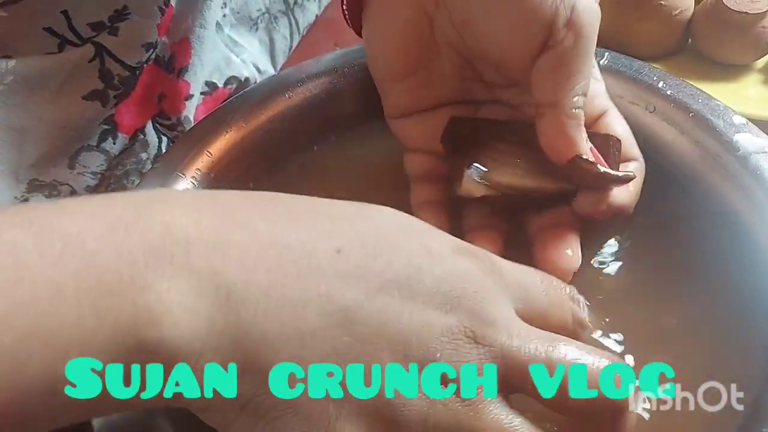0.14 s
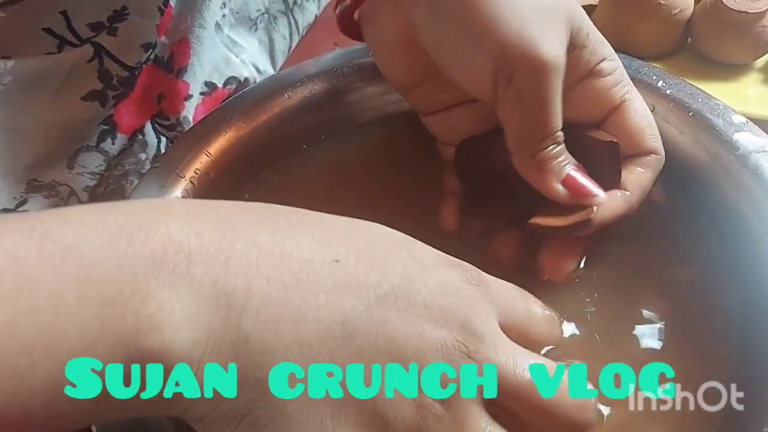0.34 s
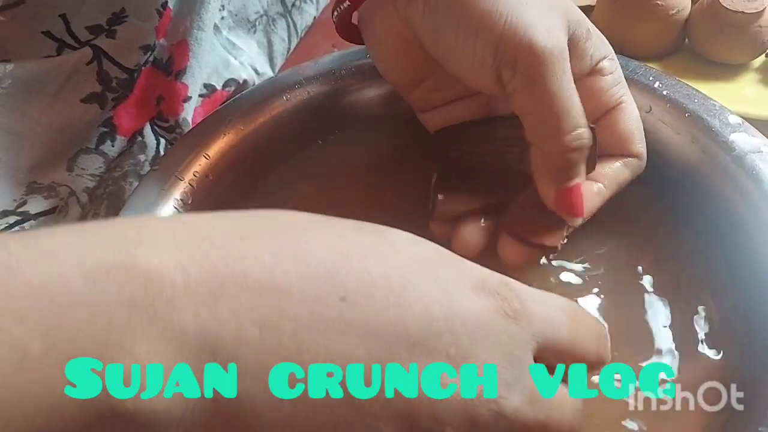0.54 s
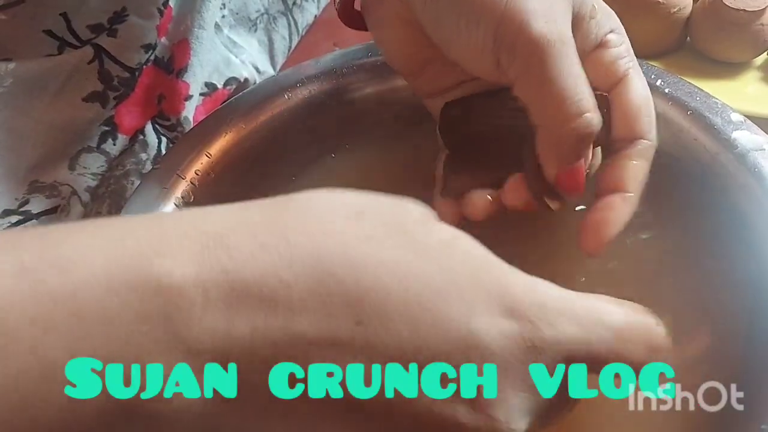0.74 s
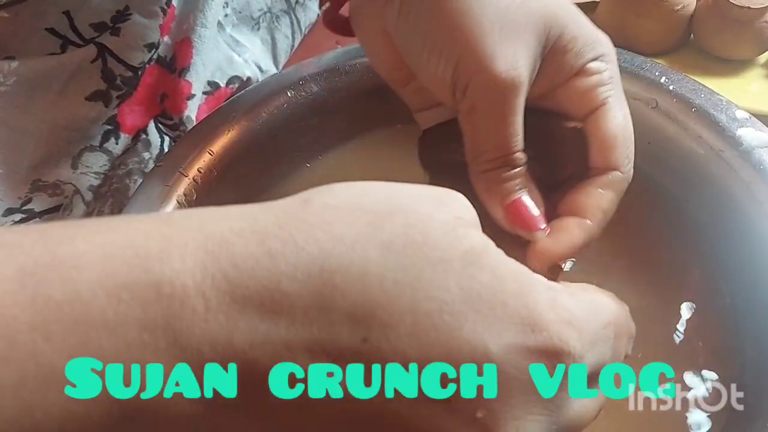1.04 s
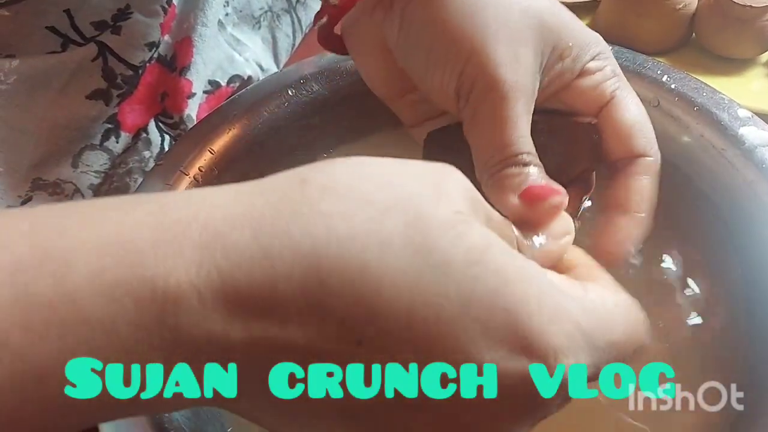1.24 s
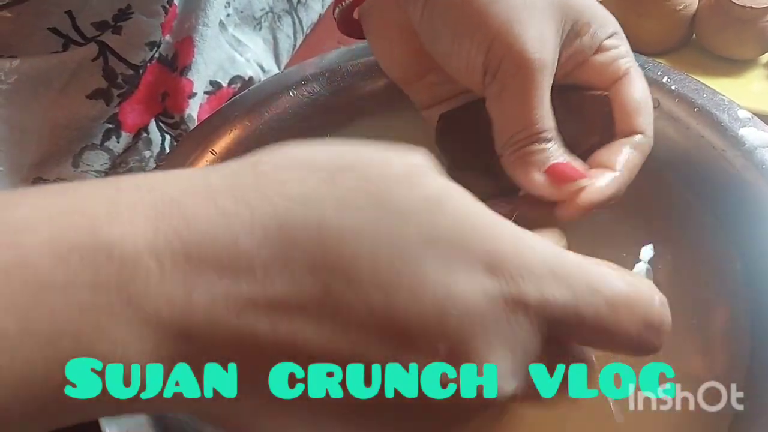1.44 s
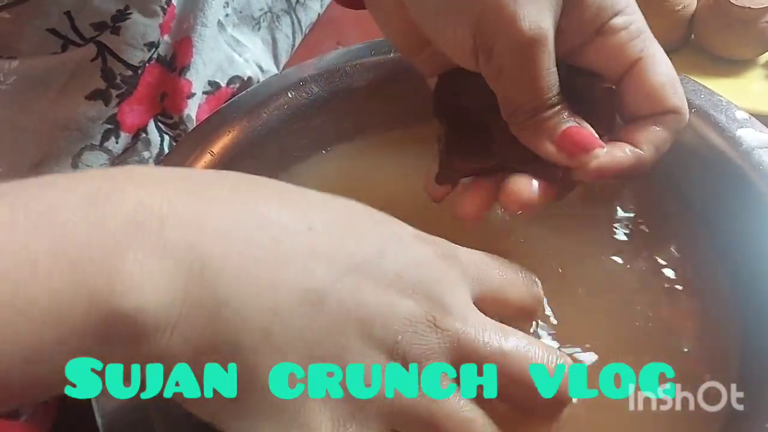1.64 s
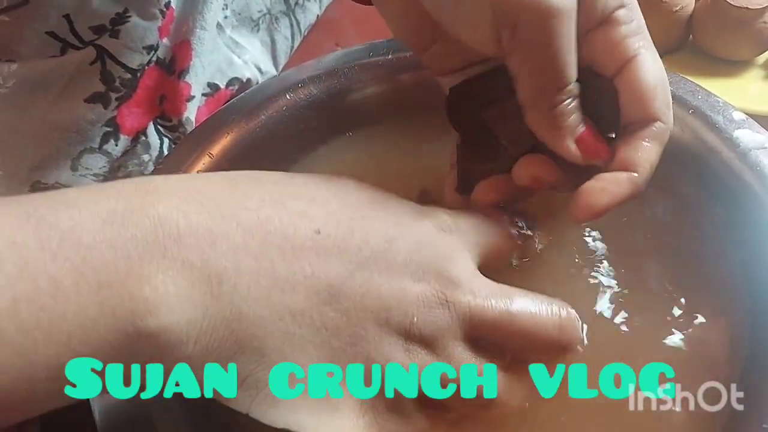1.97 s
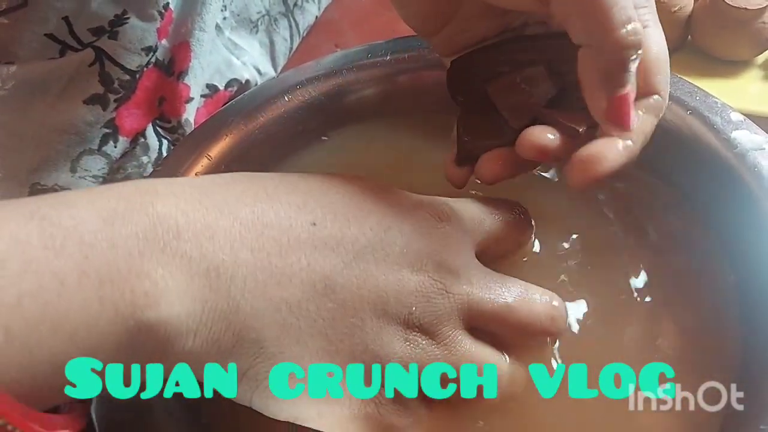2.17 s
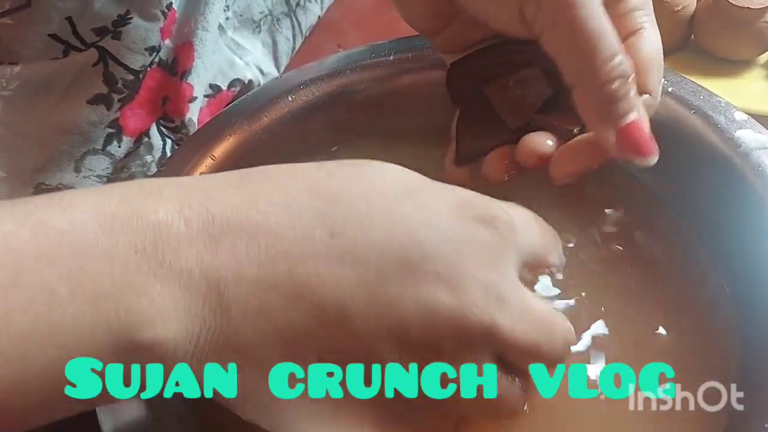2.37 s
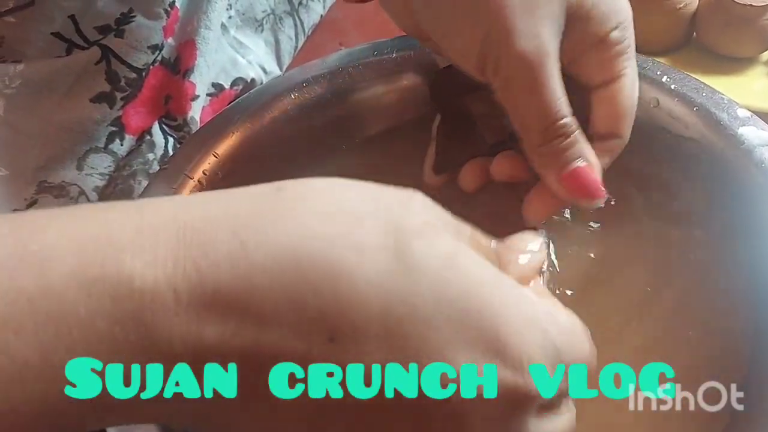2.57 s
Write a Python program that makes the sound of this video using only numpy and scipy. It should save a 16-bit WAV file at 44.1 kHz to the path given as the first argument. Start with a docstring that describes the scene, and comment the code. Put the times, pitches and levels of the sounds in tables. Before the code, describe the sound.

Wet clay shards clink and grate in the hands, close to a phone microphone; a busy cluster comes first, then a lull, then more clinks with metal basin rings, over steady distant hammering and faint hum.

```python
"""Wet clay shards over a steel basin

Taken close, on a phone: wet shards clink (ringing modes struck by a short chatter) and rub (dense grains).
Now and then they touch the basin wall, which rings in sine modes, or bump dully; droplets tick as brief tones.
Far off someone hammers at an even pace in an echoing yard: noise that swells and dies band by band.
Mains hum, two wavering sines, and room hiss, coloured noise, lie under it all."""
import sys
import numpy as np
from scipy import signal
from scipy.fft import rfft, irfft
from scipy.io import wavfile
from scipy.ndimage import uniform_filter1d

SR = 44100
rng = np.random.default_rng(int(sys.argv[2]) if len(sys.argv) > 2 else 0)


def generate_wav(signal):
    """Clip the signal to [-1, 1] and save it as 16-bit WAV at the path in sys.argv[1]."""
    frames = np.transpose(np.atleast_2d(signal))
    scaled = np.clip(frames, -1, 1) * 32767
    pcm = np.round(scaled).astype(np.int16)
    wavfile.write(sys.argv[1], SR, pcm)


N = 119070
T = np.arange(N) / SR
FREQS = np.arange(N // 2 + 1) * SR / N
APART = np.array([[0], [np.pi / 2]])  # phase of the left and right microphone ports, radians

# ringing modes of a clay shard: f/Hz, level/dB, t60/s
SHARD_MODES = [(504, -2.5, 0.064), (912, -0.5, 0.033), (1276, -1.5, 0.028), (1612, 1.5, 0.045),
               (1815, -4, 0.13), (2267, 2, 0.055), (2439, 3, 0.039), (3124, 0.5, 0.028), (3562, 1.5, 0.079),
               (4291, 1, 0.064), (4432, -3.5, 0.058), (4640, -6.5, 0.024), (5363, -4, 0.076),
               (5840, -11, 0.08)]


def undb(db):
    """Decibels to an amplitude factor."""
    return 10 ** (np.asarray(db) / 20)


def at(table, hz):
    """Second column of a table, read on a log-frequency axis."""
    points = np.array(table, float)
    return np.interp(np.log(np.maximum(hz, 1)), np.log(points[:, 0]), points[:, 1])


def shape(x, table):
    """Colour a sound by (f/Hz, level/dB) points and bring it to rms 1."""
    y = irfft(rfft(x) * undb(at(table, FREQS)), N)
    return y / np.sqrt(np.mean(y ** 2))


def stereo_noise():
    """Noise at the two ports, mixed from mid and side so that their likeness varies with pitch."""
    # likeness of the two channels: f/Hz, correlation (0 to 1)
    likeness = [(30, 0.074), (60, 0.44), (130, 1), (250, 0.6), (500, 0.43), (1500, 0.072), (15000, 0.038)]
    c = at(likeness, FREQS)
    mid, side = rfft(rng.standard_normal((2, N))) * np.sqrt([(1 + c) / 2, (1 - c) / 2])
    return irfft(np.array([mid + side, mid - side]), N)


def walk(rate):
    """Wandering curve: random values, `rate` per second, smoothed by two running means."""
    k = int(SR / rate)
    steps = np.repeat(rng.standard_normal(N // k + 1), k)
    return 0.81 * uniform_filter1d(uniform_filter1d(steps, k), k)[:N]


def ring(hz, gain, t60, phase, size):
    """Sum of dying sines for two channels; gain and phase are (channel, mode)."""
    t = np.arange(size) / SR
    modes = np.exp(np.outer(2j * np.pi * hz - np.log(1000) / t60, t))
    onset = np.minimum(t * 4000, 1)  # 0.25 ms
    return ((gain * np.exp(1j * phase)) @ modes).imag * onset


def add(out, x, s):
    """Lay a sound into the scene from s seconds on."""
    i = int(s * SR)
    out[:, i:i + x.shape[1]] += x[:, :N - i]


def room():
    """Slightly wavering hiss, and a mains hum of two sines an octave apart."""
    # level of the hum: t/s, rms level/dB near 100 Hz, rms level/dB near 200 Hz
    hum_levels = [(0.0, -72, -78), (0.32, -67, -59), (0.55, -66.5, -67), (0.59, -58, -62.5),
                  (0.87, -70.5, -65), (1.11, -60, -63.5), (1.19, -76, -74), (1.26, -60.5, -54.5),
                  (1.62, -67, -74.5), (1.67, -68, -65), (1.84, -58, -56), (2.17, -66, -69.5),
                  (2.33, -56, -56.5), (2.5, -82, -59.5), (2.59, -67, -59.5), (2.7, -70, -77)]
    # colour of the hiss: f/Hz, level/dB
    hiss_colour = [(25, -27), (50, -9.5), (80, -5), (206, -3), (516, -27.5), (660, -23), (820, -27),
                   (2200, -27), (2600, -24), (4250, -13.5), (5430, -19.5), (7100, -22.5), (16000, -34)]
    hum_hz, hiss_db = 100.35, -60.5
    s, *levels = np.array(hum_levels).T
    out = undb(hiss_db + 2.0 * walk(4.16)) * shape(stereo_noise(), hiss_colour)
    for k in range(2):
        level_db = np.interp(T, s, levels[k]) + 1.9 * walk(14.1)
        phase = 2 * np.pi * (k + 1) * hum_hz * T + 0.52 * walk(8.46)
        out += undb(3 + level_db) * np.sin(phase)  # 3 dB: rms to peak of a sine
    return out


def clinks():
    """A few ms of chatter rings the shards and a pitch of its own; a short noisy tail follows."""
    # clinks: t/s, peak level of the ring/dB, own pitch f/Hz, relative level/dB near 1 kHz, near 2 kHz,
    # near 4 kHz, share of the free ring time, chatter/ms
    clink_events = [(0.049, -45.5, 2440, -11, -16.5, -21, 1, 2.1),
                    (0.127, -45, 3900, -27, -23, -8, 0.53, 4.4), (0.138, -51, 4100, -12, 0, -27, 0.64, 3.6),
                    (0.148, -46, 935, 3, -12, -23, 1, 8), (0.201, -37.5, 3650, 13, -1, -17, 0.39, 2.2),
                    (0.237, -23.5, 1380, -4.5, -11.5, -20.5, 1, 2.5),
                    (0.242, -31, 1880, -15, -6, -13, 1, 7.8), (0.248, -27.5, 2000, -26, -26, -12, 1, 1.4),
                    (0.291, -27.5, 1930, -11.5, -12, -7, 1, 3.4), (0.315, -28, 4280, -7, -3, -22, 1, 4.3),
                    (0.339, -20, 3500, -11, -20, -8.5, 0.5, 1.56),
                    (0.342, -24.5, 4350, -10.5, -15, -27, 0.46, 3.8),
                    (0.367, -26.5, 3450, -27, -12, -19, 0.6, 2.3),
                    (0.415, -32.5, 4140, -18, -18, -7, 1, 2.2), (0.432, -39, 1820, -12.5, -28, -13, 1, 4.5),
                    (0.552, -28.5, 1713, -17, -18.5, -17.5, 0.9, 3.06),
                    (0.565, -31, 1955, -13, -15, -26, 0.6, 10), (0.747, -35, 896, -11, -8, -28, 0.7, 5.4),
                    (0.896, -42.5, 2500, -61, -2, -9, 0.86, 3.3),
                    (1.14, -54, 4400, -12, -26, -8, 0.51, 1.5), (1.159, -53.5, 2530, -29, -18, -9, 0.83, 4),
                    (1.409, -52, 1570, -25, -8, -11, 0.9, 2.8), (1.657, -43, 3600, -13, -17, -6, 0.39, 1.7),
                    (1.67, -36, 4490, -9, -13.5, -8, 1, 3.8), (1.737, -31, 1050, -3, -8.5, -37, 1, 1.6),
                    (1.774, -41, 3680, -9, -12, -8, 0.7, 4), (1.789, -35.5, 4130, -10, -15, -12, 1, 4.9),
                    (1.811, -22.5, 1165, -8, -9.5, -11, 0.8, 4), (1.87, -36, 1120, -14, -6, -8, 1, 4),
                    (1.906, -36, 2440, -28, -35, 0, 1, 2.7), (1.99, -29.5, 1150, -19, -10, -16, 0.94, 5.2),
                    (2.014, -46, 1090, -4, -18, -20, 1, 7.3), (2.06, -28, 3640, -38, -2.5, 1, 0.89, 1.7),
                    (2.074, -35, 3515, 14.5, -2, 8, 0.96, 3.6),
                    (2.113, -26, 3560, -8.5, -12, -15.5, 0.76, 5),
                    (2.123, -30, 1150, -13, -15, -17, 1, 1.5), (2.204, -35, 4180, -15, -21, -9, 1, 4.5),
                    (2.279, -32.5, 3210, -6, -12, -26, 0.46, 4.8),
                    (2.342, -35, 1650, -20, -2, -33, 0.42, 3.8),
                    (2.433, -37, 1666, -16, -14, -18.5, 1, 2.3),
                    (2.505, -36.5, 3650, -39, -17, -8, 0.53, 1.4),
                    (2.547, -38, 3690, -25, -4, -12, 0.94, 2.2),
                    (2.671, -46.5, 1760, -24, -35, -9, 0.99, 2.7),
                    (2.691, -49.5, 3850, -19, -14, -4, 0.7, 2.3)]
    own_db, own_t60_s = 4.5, 0.039  # the clink's own pitch, above its strongest colour point
    treble_db = -26.5  # 12 kHz against 4 kHz
    scatter_db, pitch_spread = 3, .02  # random spread of mode level, and of mode pitch as a share
    crack_db, tail_db, tail_t60_s = -1, -10.5, 0.67  # the share of ring time scales the tail too
    hz, mode_db, t60 = np.array(SHARD_MODES).T
    size = 6000
    t, f = np.arange(size) / SR, np.arange(size // 2 + 1) * SR / size
    out = np.zeros((2, N))
    for s, peak, own_hz, low, mid, high, held, ms in clink_events:
        colour = [(400, low - 14), (1000, low), (2000, mid), (4200, high), (12000, high + treble_db)]
        g = rng.standard_normal((5, len(hz) + 1))
        noise = rng.standard_normal((5, size))

        # the free ring of shard and own pitch, a little different each time
        own_level_db = own_db + max(low, mid, high)
        gain = undb(np.append(mode_db + at(colour, hz), own_level_db) + scatter_db * g[:2])
        pitches = np.append(hz * (1 + pitch_spread * g[3, 1:]), own_hz)
        phase = 2 * g[2] + APART * (1 + .5 * g[4])
        body = ring(pitches, gain, held * np.append(t60, own_t60_s), phase, size)

        # chatter of the contact drives it, with a sharp first knock
        chatter = np.exp(-(t * 1000 / ms) ** 2)
        push = noise[0] * chatter
        push[0] += 3
        push /= np.sqrt(np.sum(push ** 2))
        hit = signal.fftconvolve(body, push[None], axes=1)[:, :size]
        hit /= np.abs(hit.mean(axis=0)).max()

        # two channels of noise for the crack, two for the tail
        hiss = irfft(rfft(noise[1:]) * undb(at(colour, f)), size)
        hiss /= 3.26 * hiss.std()
        hit += undb(crack_db) * hiss[:2] * chatter
        tail_fall = undb(-60 * t / (held * tail_t60_s)) * np.minimum(t * 200, 1)
        hit += undb(tail_db) * hiss[2:] * tail_fall
        add(out, undb(peak) * hit, s)
    return signal.sosfilt(signal.butter(2, 350, "high", fs=SR, output="sos"), out)


def basin():
    """The steel wall rings in its modes until a hand or the water stills it; bumps are dull dying sines."""
    # modes of the basin wall: f/Hz, level/dB, t60/s
    wall_modes = [(1127, 0, .45), (400, -19, .5), (1920, -10, .35), (3560, -22, .25), (4310, -20, .25)]
    # shards touching the wall: t/s, ring level/dB, relative level/dB of modes above the first, stilled at t/s
    touches = [(.049, -61.5, -1, 0.17), (0.241, -39, 17, 0.47), (.415, -54.5, 13, 1.06),
               (.556, -44.5, 12, 0.89), (1.81, -40.5, 4, 1.92), (1.989, -35, 0, 2.075),
               (2.112, -34.5, -2, 2.7), (2.548, -68.5, 16, 2.6)]
    # dull bumps: t/s, level/dB, f/Hz, t60/s
    bumps = [(0.404, -49.5, 77, 0.26), (.408, -43.5, 204, 0.062), (2.254, -56, 1003, 0.23),
             (2.265, -41.5, 926, 0.12)]
    still_s, left_db = .02, -6  # time constant of the stilling; left port against right
    hz, mode_db, t60 = np.array(wall_modes).T
    size = 20000
    out = np.zeros((2, N))
    for s, level_db, upper_db, stop in touches:
        gain = undb(level_db + mode_db + upper_db * (hz > hz[0])) * undb([[left_db], [0]])
        phase = rng.uniform(0, 6.1, len(hz)) + APART
        still = np.exp(-np.maximum(T[:size] + s - stop, 0) / still_s)
        waver = undb(0.5 * walk(46)[:size])
        add(out, still * waver * ring(hz, gain, t60, phase, size), s)
    for s, db, bump_hz, bump_t60 in bumps:
        gain = undb(db) * np.ones((2, 1))
        add(out, ring(np.array([bump_hz]), gain, np.array([bump_t60]), np.zeros((2, 1)), size=9000), s)
    return out


def rubbing():
    """Dense grains of wet clay on clay: a hiss, the shards' modes and a bright grit."""
    # strokes: start t/s, length/s, level/dB, relative level/dB of the grit
    strokes = [(0.124, 0.11, -56.5, -18), (0.166, 0.24, -45, -11.5), (0.386, 0.29, -54, -14),
               (0.819, 0.11, -56, -6), (1.128, 0.048, -67.5, -4), (1.395, 0.088, -64.5, -12),
               (1.564, .07, -65.5, -0.5), (1.643, 0.057, -51.5, -9), (1.686, 0.1, -51, -17),
               (1.74, .09, -55, -5), (1.854, 0.099, -45.5, -10), (1.904, 0.2, -50, -15),
               (2.132, 0.19, -45.5, -9), (2.298, 0.18, -57.5, -14), (2.415, 0.043, -56, -10),
               (2.454, 0.12, -58, -28)]
    # colour of hiss and rung modes together: f/Hz, level/dB
    rub_colour = [(290, -67), (500, -15.5), (1010, -32.5), (1110, -12), (1220, -12.5), (2340, -6.5),
                  (2880, -6), (4180, -5.5), (8000, -6.5), (10400, -27), (17600, -120)]
    # colour of the grit: f/Hz, level/dB
    grit_colour = [(3530, -118), (6000, -1.5), (7960, -25), (9900, 0.5), (14300, -2.5), (16000, -11)]
    grains_per_s, grain_db, ring_db = 6000, 2.6, -6  # grain_db: mean excess of a grain's strength
    edge = .45  # share of a stroke spent rising, and again falling

    # each grain is a burst of noise dying within about a millisecond
    hits = (rng.random(N) < grains_per_s / SR) * undb(grain_db * rng.exponential(size=N))
    env = signal.lfilter([1], [1, -.97], hits * undb(0.83 * walk(39.93)))
    grains = stereo_noise() * env

    hz, mode_db, t60 = np.array(SHARD_MODES).T
    phase = rng.uniform(0, 6, (2, len(hz)))
    body = ring(hz, undb(mode_db) * np.ones((2, 1)), t60, phase, size=5000)
    rung = signal.fftconvolve(grains, body, axes=1)[:, :N]
    hiss = shape(grains / grains.std() + undb(ring_db) * rung / rung.std(), rub_colour)
    grit = shape(grains, [(2000, -60)] + grit_colour)

    out = np.zeros((2, N))
    for s, length, db, grit_db in strokes:
        arch = np.clip(np.minimum(T - s, s + length - T) / (edge * length), 0, 1)
        out += arch * undb(db) * (hiss + undb(grit_db) * grit)
    return out


def hammer():
    """Each distant blow arrives as a swell of echoes dying band by band, with one thin steel ring."""
    # blows: t/s, level/dB, relative level/dB of the steel ring
    blows = [(0.2, -39, -17), (0.72, -40, -9.5), (1.239, -41, -15), (1.766, -37, -24), (2.283, -37, -36)]
    # colour of the blows: f/Hz, level/dB
    blow_colour = [(41, -44), (70, -11.5), (217, -1), (588, -6.5), (876, -3), (1000, -10), (4230, -7),
                   (8040, -32), (8990, -23), (14000, -52)]
    # dying away in the yard: f/Hz, t60/s
    yard_t60 = [(100, 1), (300, .8), (800, .55), (2000, 0.57), (5000, 0.29), (12000, 0.68)]
    # swell, lows build up later: f/Hz, rise/s
    swell = [(100, 0.021), (1000, 0.018), (3000, 0.009)]
    echo_s, echo_db = .024, -12.5
    ring_hz, ring_t60_s = 8700, .3

    def fall(s, rise, t60):
        """Linear rise from s on, under an exponential fall."""
        return undb(-60 * np.maximum(T - s, 0) / t60) * np.clip((T - s) / rise, 0, 1)

    spec = rfft(shape(stereo_noise(), blow_colour))
    out = np.zeros((2, N))
    for hz in 70 * 2. ** np.arange(0, 8.1, .5):  # overlapping bands half an octave apart
        band = np.clip(1 - 2 * np.abs(np.log2(np.maximum(FREQS, 1) / hz)), 0, 1)
        rise, t60 = at(swell, hz), at(yard_t60, hz)
        env = np.zeros(N)
        for s, db, _ in blows:
            echo = undb(echo_db) * fall(s + echo_s, rise, t60 / 2)
            env += undb(db) * (fall(s, rise, t60) + echo)
        out += irfft(spec * band, N) * env * undb(1.75 * walk(29.89))

    # the steel ring's phase wanders separately in each channel
    tone = np.sin(2 * np.pi * ring_hz * T + 5.3 * np.array([walk(60), walk(50)]))
    for s, db, ring_db in blows:
        out += tone * undb(db + ring_db) * fall(s, 0.03, ring_t60_s)
    return out


def droplets():
    """Tiny bright ticks: a dying sine and a click of band-passed noise falling at the same pace."""
    # droplets: t/s, level of the tone/dB, f/Hz, t60/s
    drops = [(1.5545, -45, 8900, 0.0073), (1.5568, -29, 6100, 0.009), (1.5652, -41.5, 3960, 0.028),
             (1.5895, -51, 10000, .008), (1.616, -51, 6850, 0.011), (1.755, -47, 12900, 0.032),
             (2.25, -43, 4960, 0.01)]
    click_db = 2.5  # against the tone
    size = 1500
    out = np.zeros((2, N))
    for s, peak, hz, t60 in drops:
        phase = rng.uniform(0, 12.3) + APART
        tone = ring(np.array([hz]), np.ones((2, 1)), np.array([t60]), phase, size)
        band = signal.butter(2, [hz * 0.88, min(hz * 1.65, 18000)], "band", fs=SR, output="sos")
        click = signal.sosfilt(band, rng.standard_normal((2, size))) * undb(-60 * T[:size] / t60)
        add(out, undb(peak) * (tone + undb(click_db) * click), s)
    return out


def scene():
    """All sources together at the phone."""
    return room() + clinks() + basin() + rubbing() + hammer() + droplets()


def record(dry):
    """The two microphone ports colour differently; the top is cut in two steps."""
    # balance of the ports: f/Hz, left minus right level/dB
    port_balance = [(60, -20), (110, -5.0), (200, 0), (380, 0), (700, -0.5), (1290, 3.5), (2380, -3),
                    (4400, -10), (8120, -5), (15000, 10)]
    edge_hz, edge_db, top_hz = 15700, -22, 16500
    tilt = at(port_balance, np.maximum(FREQS, 100)) / 2  # constant below 100 Hz
    shelf = np.where(FREQS > edge_hz, undb(edge_db), 1)
    y = irfft(rfft(dry) * undb([tilt, -tilt]) * shelf, N)
    return signal.sosfilt(signal.ellip(10, .2, 70, top_hz, fs=SR, output="sos"), y)


dry = scene()
out = record(dry)
generate_wav(out)
```